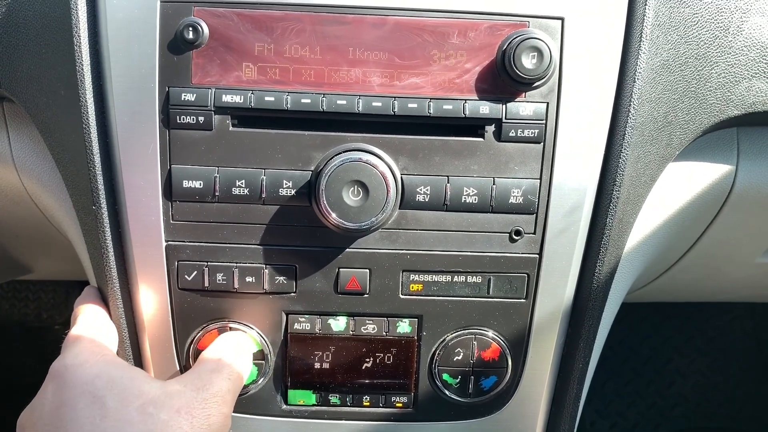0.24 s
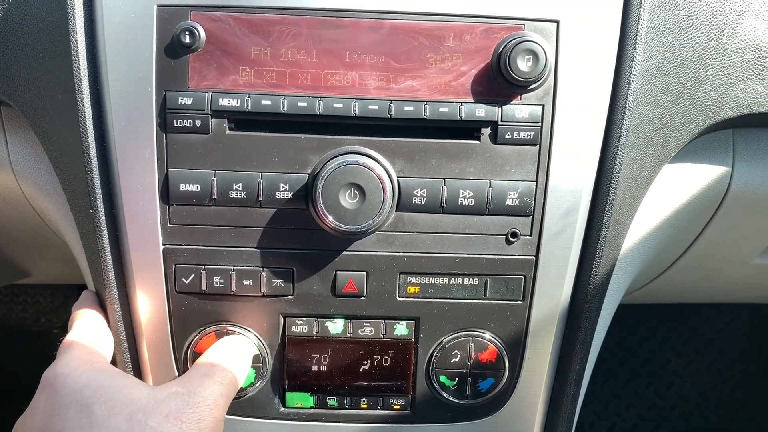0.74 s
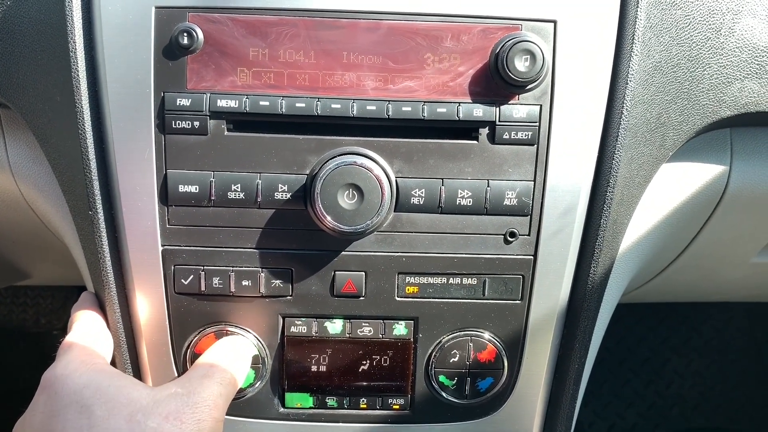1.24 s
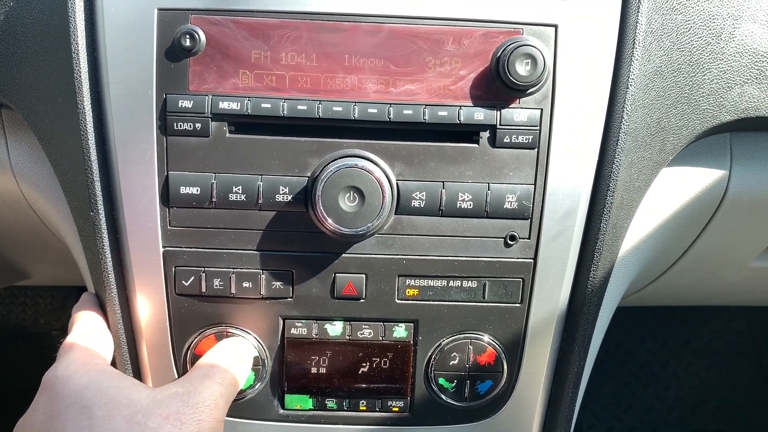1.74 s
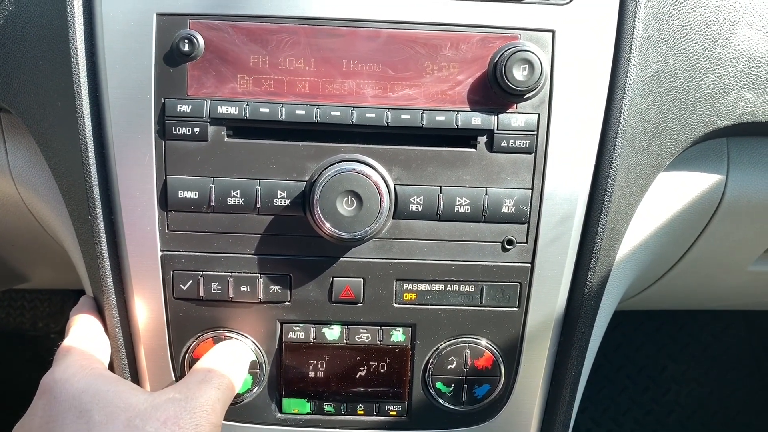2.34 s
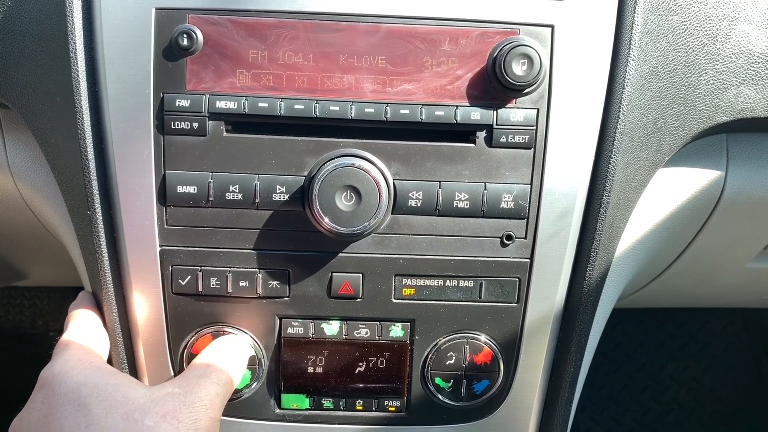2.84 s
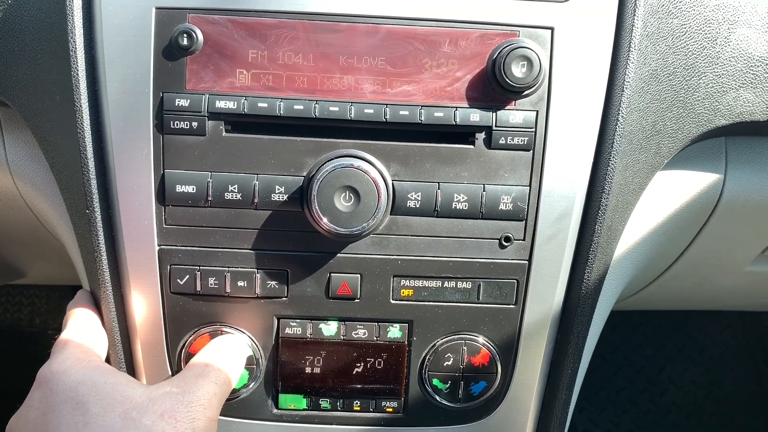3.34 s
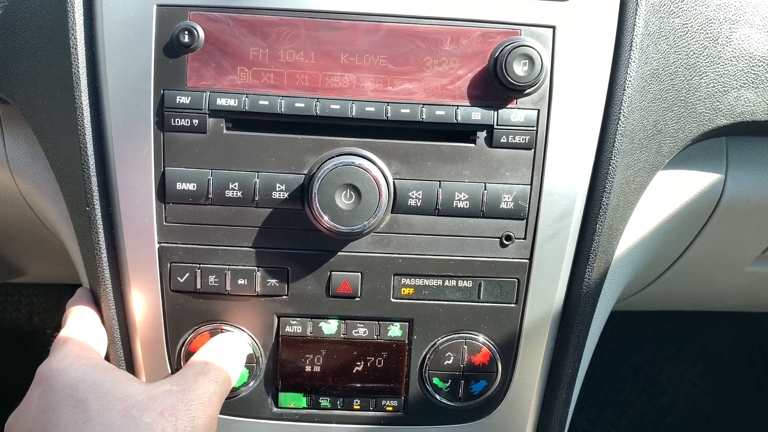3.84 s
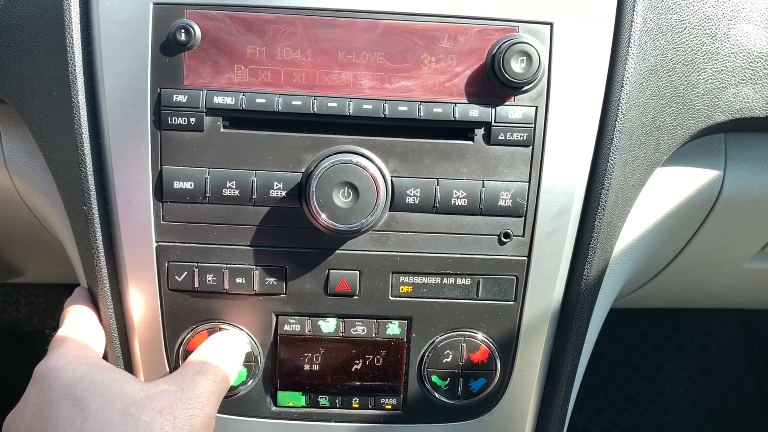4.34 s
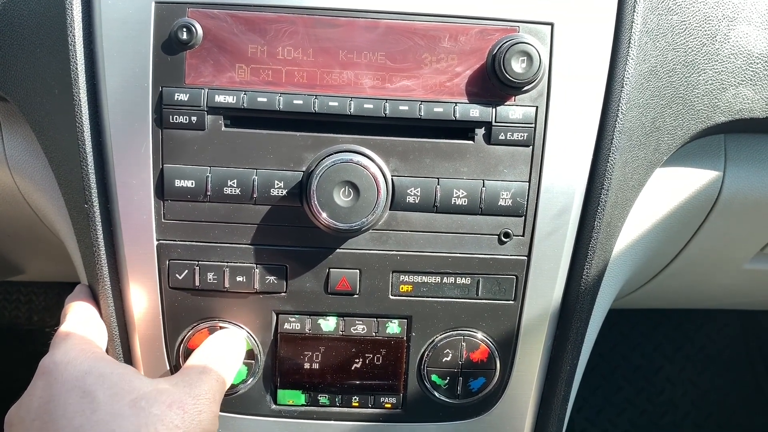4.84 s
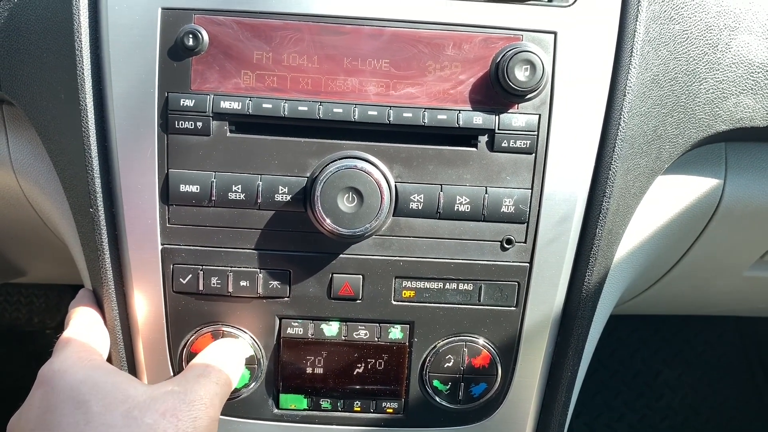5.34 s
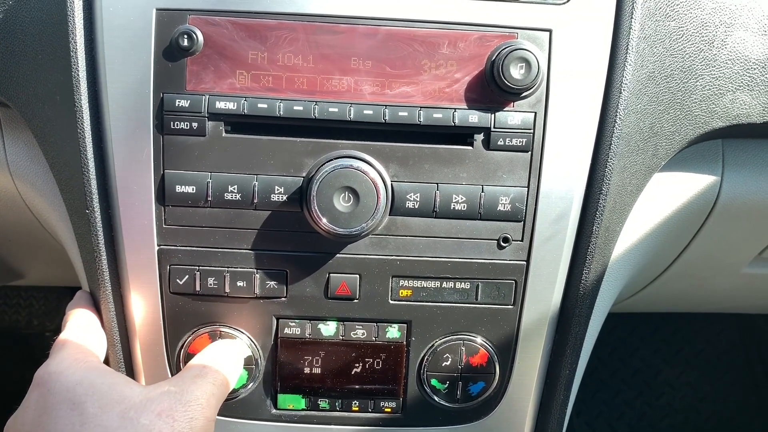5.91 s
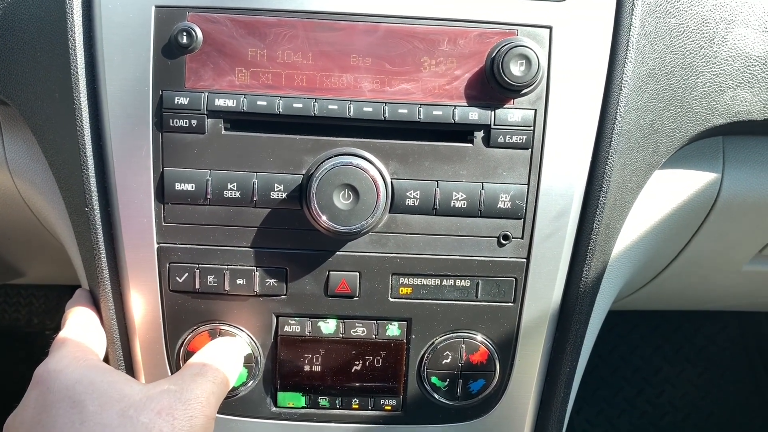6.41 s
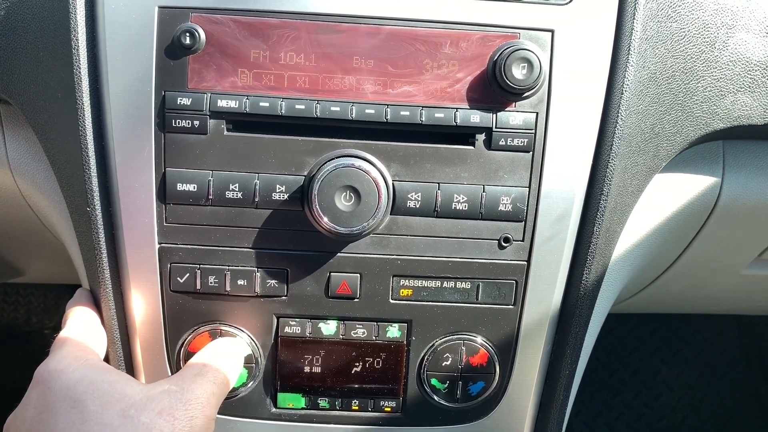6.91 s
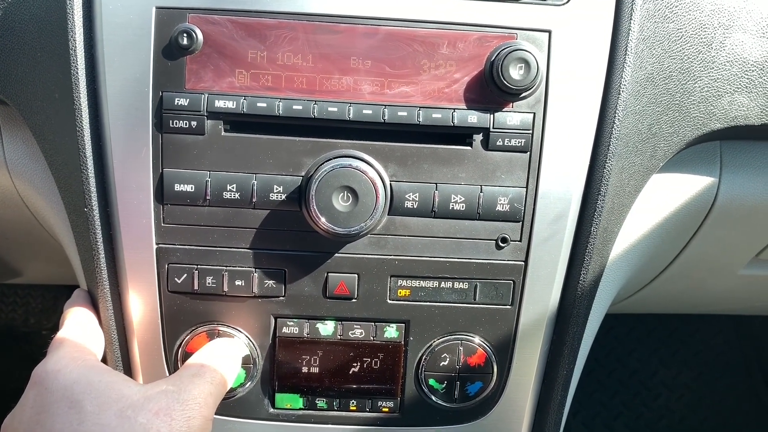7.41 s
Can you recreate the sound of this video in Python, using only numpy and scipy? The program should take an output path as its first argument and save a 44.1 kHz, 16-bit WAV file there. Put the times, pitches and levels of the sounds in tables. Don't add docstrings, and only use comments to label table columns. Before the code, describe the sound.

Broad rushing air from car vents with a thin motor whine, stepping up to a stronger blast after a small click, engine humming underneath.

```python
import sys
import numpy as np
from scipy import signal
from scipy.fft import rfft, irfft, next_fast_len
from scipy.io import wavfile
from scipy.ndimage import uniform_filter1d

SR = 44100
rng = np.random.default_rng(int(sys.argv[2]) if len(sys.argv) > 2 else 0)


def generate_wav(signal):
    frames = np.transpose(np.atleast_2d(signal))
    scaled = np.clip(frames, -1, 1) * 32767
    pcm = np.round(scaled).astype(np.int16)
    wavfile.write(sys.argv[1], SR, pcm)


def boost_factor(decibels):
    exponent = np.asarray(decibels, float) / 20
    return 10 ** exponent


N = 337806

# frequency in Hz, likeness of the two sides from 0 to 1, right phase in half turns,
# left-right balance in dB.
PORTS_LOW = [(30, 0.24, 0, 0.5), (202, .4, 0, 0), (358, 0.77, -0.08, -0.5), (454, 0.69, 0, -1),
             (667.4, 0.9, -0.76, -1), (843, 0.79, -2, -0.5), (1024, 0.54, -2.5, -4), (1277, 0.57, -4, -1),
             (1385, 0.28, -5, 0), (1463, 1, -4, -3), (1584, 0.3, -4.5, -3), (1770, 0.36, -2, 0),
             (2000, 0.35, -4, 4)]
PORTS_MID = [(2155, 0.6, -3.5, -11), (2410, 0.087, -4, 3), (2750, 0.41, -3, -3.5), (3500, 0.23, -3.5, 1.5),
             (3470, 0.13, -4, -4), (4080, 0.77, -4.5, -2.5), (4630, 0.65, -4.5, -3), (4920, 0.18, -4, 0),
             (5130, 0.21, -5, -5.5), (6640, 0.21, -4.5, 2), (7600, 1, -4.5, -1.5), (8200, 0.76, -5, -11)]
PORTS_HIGH = [(8350, .97, -5, 0), (8900, .97, -4.95, 0), (9500, .7, -4.7, 0), (10300, .8, -4.2, 0),
              (10420, 1, -4, 0), (11680, 1, -4, 0), (11900, .4, -3.7, 0), (12350, .5, -3.4, 0),
              (12550, 1, -3, 0), (14300, 1, -3, 0), (14800, .6, -2.3, 0), (15250, 1, -2, 0),
              (20000, 1, -2, 0)]


def setting(lag_s):
    # start in seconds, spin-up time in seconds.
    knob_turns = [
        (-.05, .55),
        (4.72, .5),
    ]
    t = np.arange(N) / SR
    ramps = [np.clip((t - start) / spin_s, 0, 1) for start, spin_s in knob_turns]
    steps = sum(u * u * (3 - 2 * u) for u in ramps)
    r = np.exp(-1 / (max(abs(lag_s), 1e-4) * SR))
    return signal.lfilter([1 - r], [1, -r], steps, zi=[r * steps[0]])[0]


def by_setting(values, lag_s=0):
    return np.interp(setting(lag_s), [0, 1, 2], values)


def drift(rate_hz):
    coarse = 40
    r = np.exp(-2 * np.pi * coarse * rate_hz / SR)
    noise = rng.standard_normal(N // coarse + 2002)
    slow = signal.lfilter([1], [1, -2 * r, r * r], noise)[2000:]
    return np.interp(np.arange(N) / coarse, np.arange(len(slow)), slow / slow.std())


def at_hz(rows, hz):
    f, *columns = np.transpose(rows)
    return [np.interp(np.log(hz), np.log(f), column) for column in columns]


def air(pulse_db):
    layer_edges_hz = [180, 1700, 7500]
    level_bands_hz = [(55, 180), (400, 1700), (1700, 7500), (9000, 12000)]
    flicker_db = [0.36, 0.67, 0.43, 0.95]
    size = 2 * next_fast_len(N // 2 + 1)
    hz = np.maximum(np.arange(size // 2 + 1) * SR / size, 1)
    noise = rfft(rng.standard_normal((3, size))) * [cabin(hz) for vent in range(3)]
    pair = to_ports(noise[0], noise[1:], hz) * boost_factor(air_colour(hz))
    below = [0] + [1 / (1 + (hz / edge) ** 8) for edge in layer_edges_hz] + [1]
    out, gust = 0, drift(5.6)
    for k, level_db in enumerate(flow_levels()):
        low_hz, high_hz = level_bands_hz[k]
        inside = (hz > low_hz) & (hz < high_hz)
        rms = np.sqrt(2 * np.sum(np.abs(pair[:, inside].mean(axis=0)) ** 2)) / size
        layer = irfft(pair * (below[k + 1] - below[k]), size)[:, :N] / rms
        flicker = flicker_db[k] * (.5 * gust + drift(7.8))
        rotor_pulse = pulse_db * (k > 1)
        out = out + layer * boost_factor(level_db + flicker + rotor_pulse)
    return out


def air_colour(hz):
    # frequency in Hz, level in dB
    # per Hz.
    air_tone = [(20, -76), (35, -54.5), (60, -49), (100, -54), (180, -69), (300, -69), (460, -75.5),
                (555, -79), (720, -66.5), (1000, -75), (1500, -79.5), (1760, -84.5), (1950, -86.5),
                (2350, -90),
                (2700, -88.5), (2950, -92.5), (3500, -96), (5000, -99), (7000, -102), (7700, -104),
               (8300, -99), (10200, -101), (10700, -107), (12500, -110), (14000, -114), (14600, -122),
               (15100, -114), (15700, -118)]
    # frequency in Hz, width in Hz, lift in dB.
    resonances = [(208.5, 26, -5.5), (470.5, 66, 5.5), (542, 45, -3.5), (652, 26, -6.5), (890, 72, 2.5),
                  (1164, 95, 3.5), (1480, 54, 4), (2039, 51, 9), (2105, 126, 5.5), (2730, 330, 0.5),
                  (4090, 350, 4), (7900, 93, -10), (8000, 45, 2.5), (1760, 52, -4.5), (8930, 190, 8),
                  (9300, 40, 3)]
    colour_db = at_hz(air_tone, hz)[0] - 40 * np.maximum(np.log2(20 / hz), 0)
    for centre_hz, width_hz, lift_db in resonances:
        colour_db = colour_db + lift_db / (1 + (2 * (hz - centre_hz) / width_hz) ** 2)
    return colour_db


def flow_levels():
    # level in dB at low, middle and high setting, lag in seconds.
    layers = [
        (-40, -37, -32, 0.15),
        (-55, -49, -45.5, 0.017),
        (-66.5, -59, -53, 0.019),
        (-83, -78, -69, .02),
    ]
    levels = [by_setting(row[:3], row[3]) for row in layers]
    catch_s, slip_s, lift_db = 6.1, 6.82, 5
    vane_db = np.interp(np.arange(N) / SR, [catch_s, slip_s, slip_s + .08], [0, lift_db, 0])
    levels[3] = levels[3] + vane_db
    return levels


def cabin(hz):
    t60_s, scatter_db, from_hz = .16, -13, 2500
    t = np.arange(SR // 4) / SR
    scatter = rng.standard_normal(len(t)) * boost_factor(-60 * t / t60_s)
    scatter = scatter / np.linalg.norm(scatter)
    share = boost_factor(scatter_db) / (1 + (from_hz / hz) ** 4)
    return (1 + share * rfft(scatter, 2 * len(hz) - 2)) / np.sqrt(1 + share ** 2)


def to_ports(shared, apart, hz):
    alike, half_turns, balance_db = at_hz(PORTS_LOW + PORTS_MID + PORTS_HIGH, hz)
    alike = np.clip(alike, 0, 1)
    turn = np.array([np.ones_like(hz), np.exp(1j * np.pi * half_turns)])
    both = np.sqrt(alike) * shared * turn + np.sqrt(1 - alike) * apart
    return both * boost_factor(np.outer([.5, -.5], balance_db))


def opposed_rumble():
    rumble = hiss(178, 345, -57, channels=1)
    return rumble * boost_factor(by_setting([-3, 0, 3])) * [[1], [-1]]


def motor():
    # multiple of the contact rate, level in dB at middle speed,
    # level in dB at high speed.
    partials = [(1, 15, 21), (11, -8, 3), (12, 2, 4), (37 / 3, -4, -20), (77 / 6, -4, -20), (13, -3, -3),
                (79 / 6, -20, -1), (40 / 3, -2, -20), (14, -4, -7), (43 / 3, -2, -20), (15, 0, -2),
                (91 / 6, -5, -20), (16, -4, -8), (17, -4, -12), (21, -6, -11), (27, -20, -8), (30, -20, -8),
                (32, -11, -20), (33, -20, -7), (34, -20, -11), (35, -20, -2), (38, -18, -8), (39, -20, -8)]
    contact_hz = [187, 199.4, 236]
    level_db = [-82, -79, -77]
    rate_hz, whine_db = by_setting(contact_hz), by_setting(level_db)
    fast = np.clip((rate_hz - 200) / 35, 0, 1)
    contacts = np.cumsum(rate_hz * (1 + .0004 * drift(2.0))) / SR
    out, ports = 0, np.transpose(PORTS_LOW + PORTS_MID + PORTS_HIGH)
    for multiple, middle_db, high_db in partials:
        half_turns = multiple / 50
        if multiple > 26:
            half_turns = np.interp(multiple * rate_hz, ports[0], ports[2])
        phases = 2 * np.pi * (multiple * contacts + rng.random()) + np.pi * half_turns * np.array([[0], [1]])
        partial_db = middle_db + fast * (high_db - middle_db) + 2.7 * drift(8.0)
        out = out + boost_factor(partial_db) * np.sin(phases)
    contact = 2 * np.pi * contacts
    turn = contact / 6
    pulse_db = .45 * np.sin(turn) + .4 * np.sin(contact)
    pulse_db = pulse_db + .55 * np.sin(contact - turn) + .4 * np.sin(2 * contact)
    return np.sqrt(2) * boost_factor(whine_db) * out, pulse_db * (1 - 0.46 * fast)


def engine():
    idle_hz, wander_hz = 47.7, .08
    idle_db, load_db, swell_db = -41, 9.5, 3
    leads_s = 0.11
    port_radians = 0.34
    t = np.arange(N) / SR
    load = np.interp(t + leads_s, t, np.maximum(setting(0) - 1, 0))
    pitch_hz = idle_hz + wander_hz * drift(0.94)
    level_db = idle_db + load_db * load + swell_db * (1 - 0.9 * load) * drift(1.1)
    level_db = level_db + 1.3 * drift(7.0)
    phase = 2 * np.pi * np.cumsum(pitch_hz) / SR + port_radians * np.array([[1], [-1]])
    return np.sqrt(2) * boost_factor(level_db) * np.sin(phase)


def knob():
    tick_s, tick_hz, t60_s, level_db = 4.667, 11300, .012, -58
    since = np.maximum(np.arange(N) / SR - tick_s, 0)
    return boost_factor(level_db - 60 * since / t60_s) * np.sin(2 * np.pi * tick_hz * since)


def hiss(low_hz, high_hz, level_db, channels):
    band = signal.butter(8, [low_hz, high_hz], "band", fs=SR, output="sos")
    noise = signal.sosfilt(band, rng.standard_normal((channels, N)))
    return boost_factor(level_db) * noise / noise.std()


def wind_corner():
    on_s, snap_s, start_hz = 1.05, .17, 175
    creep_hz, creep_s, climb_hz, climb_lag_s = 134, 0.63, 103, 0.34
    since = np.arange(N) / SR - on_s
    creep = creep_hz * (1 - np.exp(-np.maximum(since, 0) / creep_s))
    climb = climb_hz * np.maximum(setting(climb_lag_s) - 1, 0)
    return 6 + np.clip(since / snap_s, 0, 1) * (start_hz + creep + climb)


def wind_filter(pair):
    lift_db, lift_from_hz, top_hz = 4.0, 139, 14900
    hz, s, frames = signal.stft(pair, SR, nperseg=2048)
    hz = np.maximum(hz[:, None], 1)
    corner_hz = wind_corner() * (1 + 0.073 * drift(7.1))
    corner_hz = np.interp(s * SR, np.arange(N), corner_hz)
    passed = 1 / (1 + (corner_hz / hz) ** 24)
    merged = 1 / (1 + (hz / (1.08 * corner_hz + 30)) ** 6)
    frames[0] *= boost_factor(lift_db * merged / (1 + (lift_from_hz / hz) ** 4))
    frames[1] *= passed
    return signal.istft(frames * (hz < top_hz), SR, nperseg=2048)[1][:, :N]


def top_hiss():
    swing_hz = 1.0
    t = np.arange(N) / SR
    urge = np.sin(2 * np.pi * swing_hz * (t + .04)) + .5 * drift(15.0) + .25 - .4 * (t > 5.5)
    gate = uniform_filter1d(1. * (urge > 0), size=900)
    return hiss(14800, 15700, -85.5, channels=1)[0] * gate


def scene():
    whine, pulse_db = motor()
    return air(pulse_db) + opposed_rumble() + whine + engine() + knob()


def low_pass(x):
    return signal.sosfilt(signal.butter(12, 16870, fs=SR, output="sos"), x)


def record(dry):
    dry = dry + hiss(7330, 9250, -79, channels=2)
    pair = np.array([dry[0] + dry[1], dry[0] - dry[1]]) / 2
    mid, side = wind_filter(pair)
    mid = mid + top_hiss()
    return low_pass(np.array([mid + side, mid - side]))


dry = scene()
out = record(dry)
generate_wav(out)
```